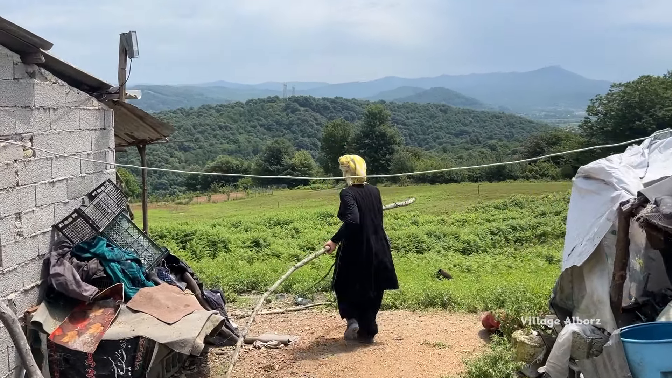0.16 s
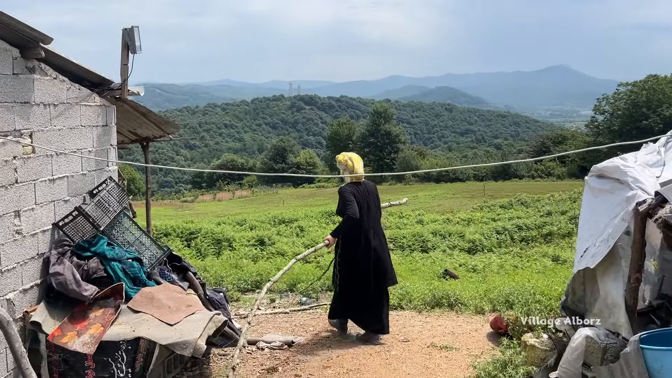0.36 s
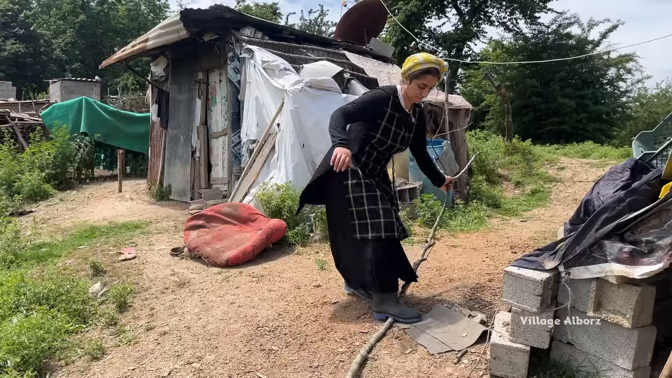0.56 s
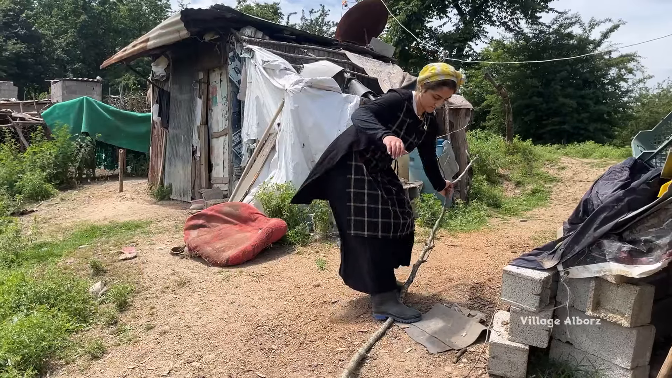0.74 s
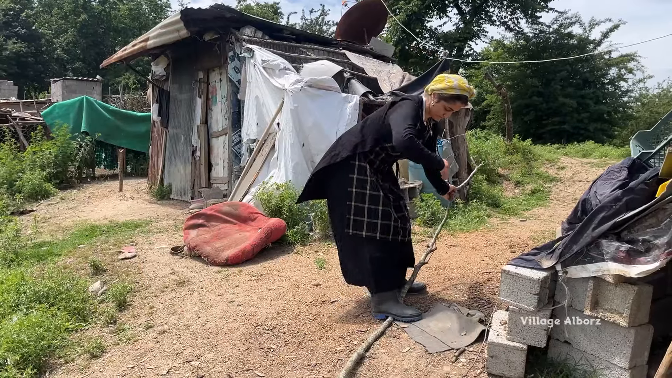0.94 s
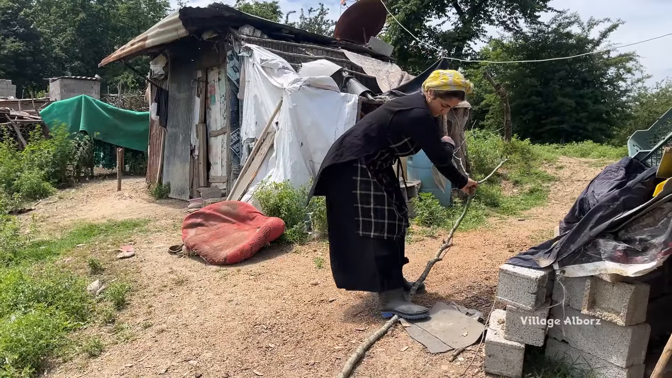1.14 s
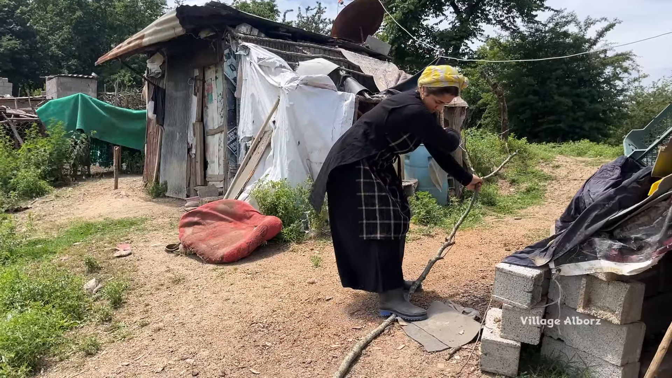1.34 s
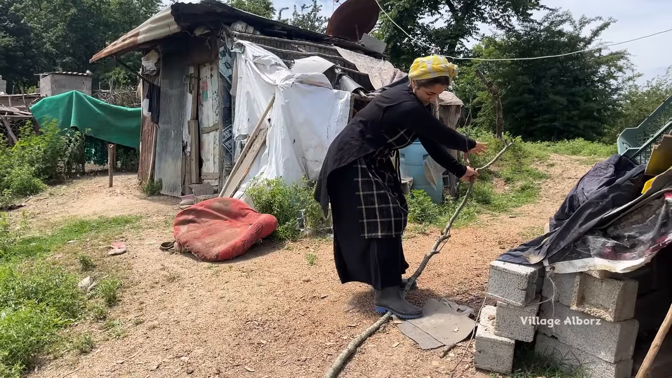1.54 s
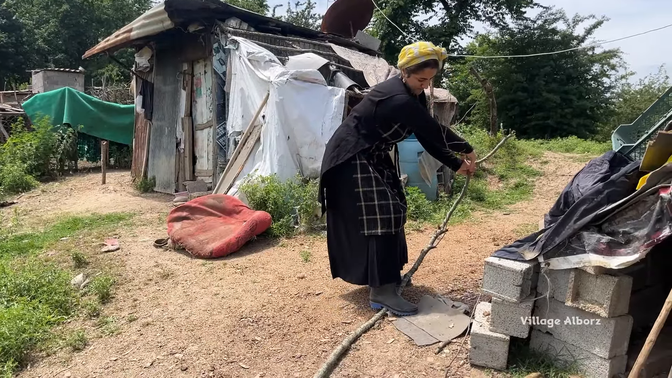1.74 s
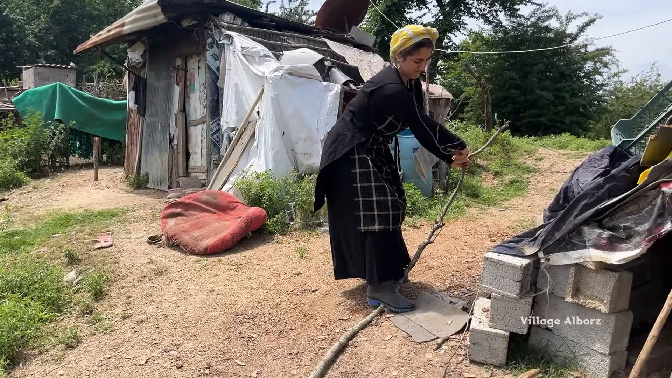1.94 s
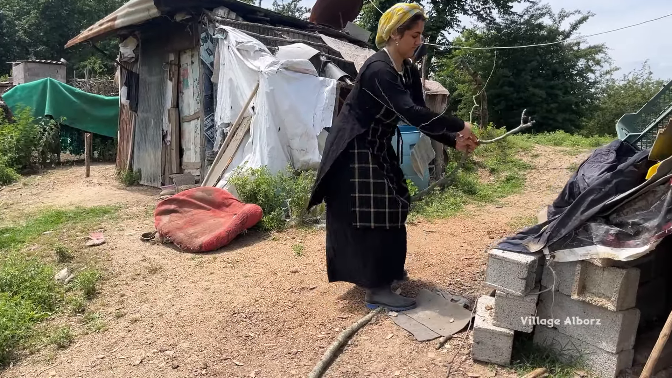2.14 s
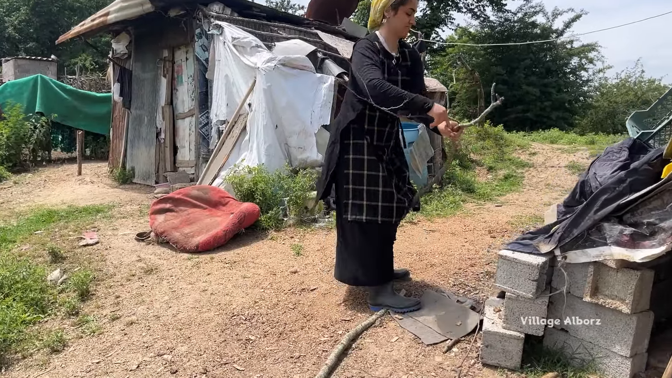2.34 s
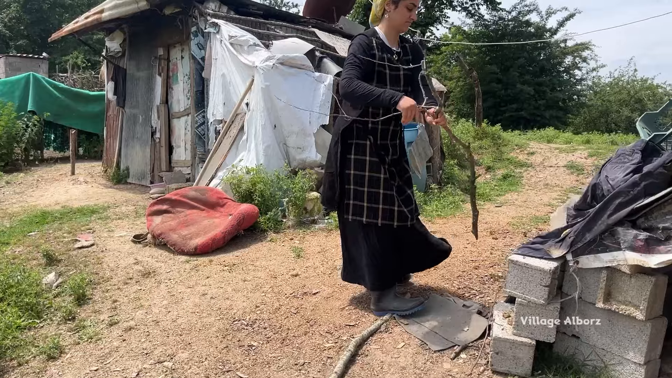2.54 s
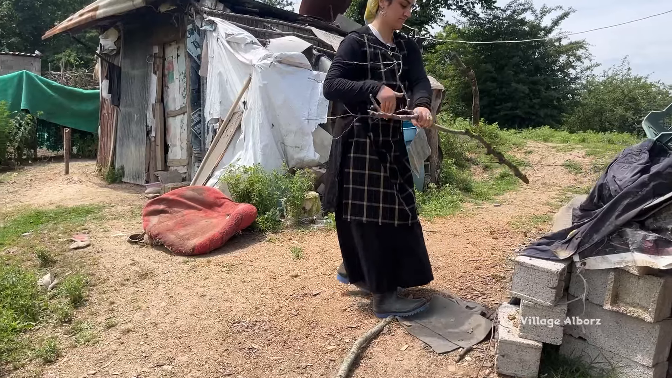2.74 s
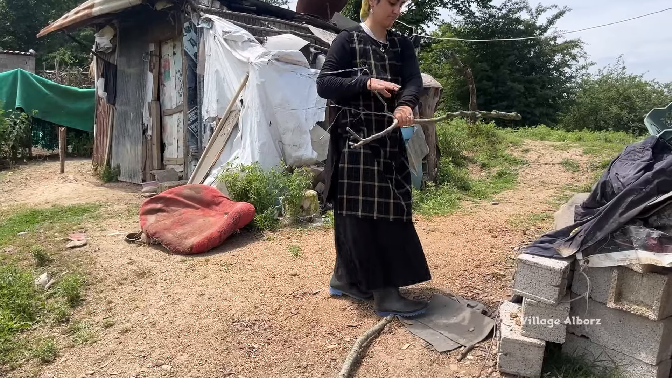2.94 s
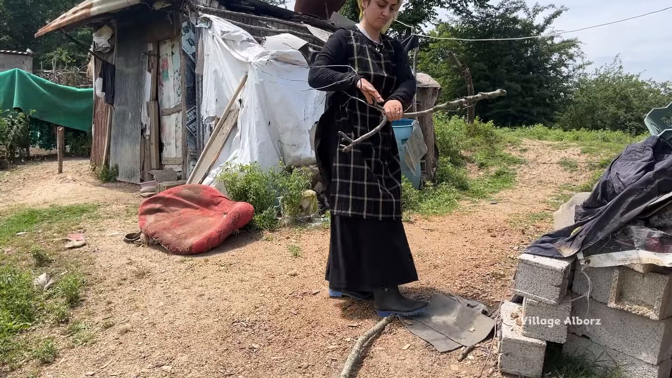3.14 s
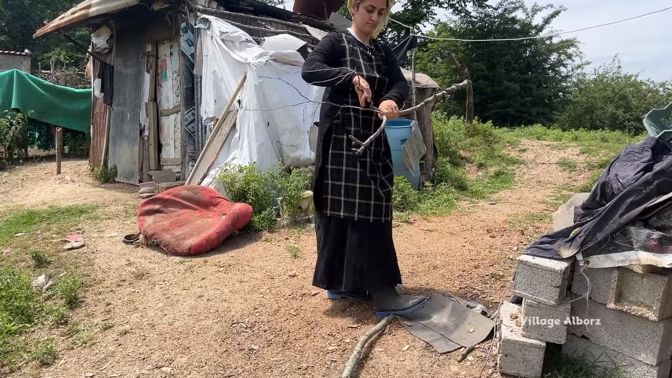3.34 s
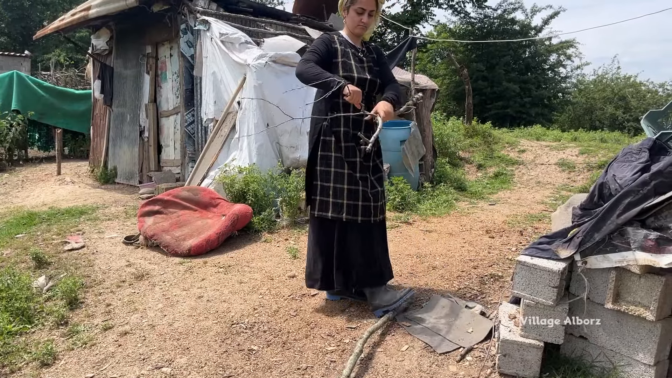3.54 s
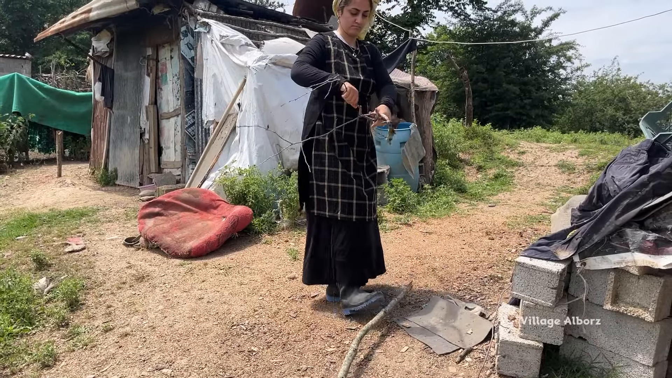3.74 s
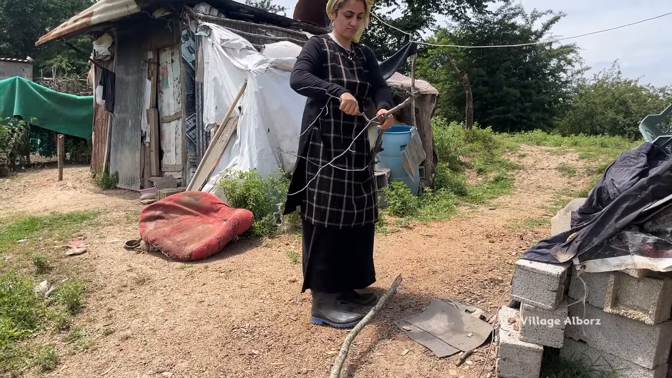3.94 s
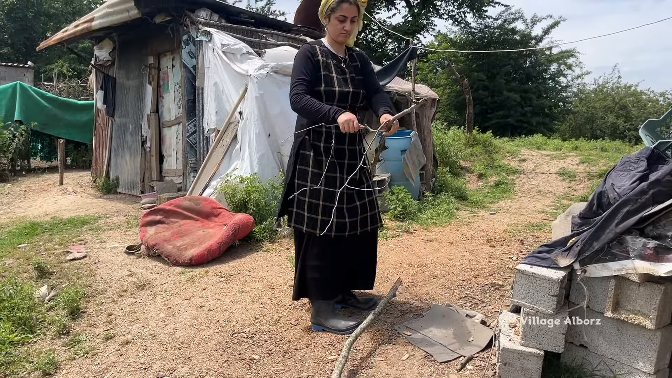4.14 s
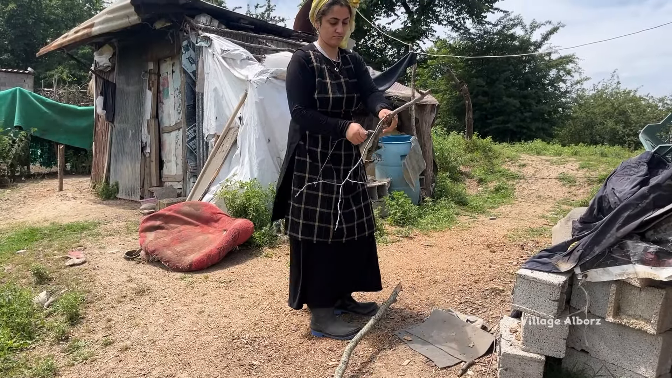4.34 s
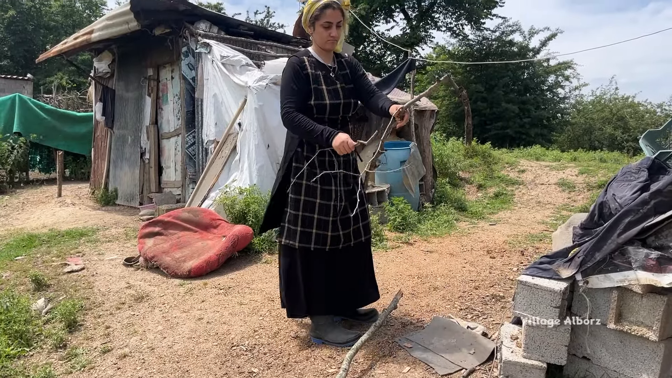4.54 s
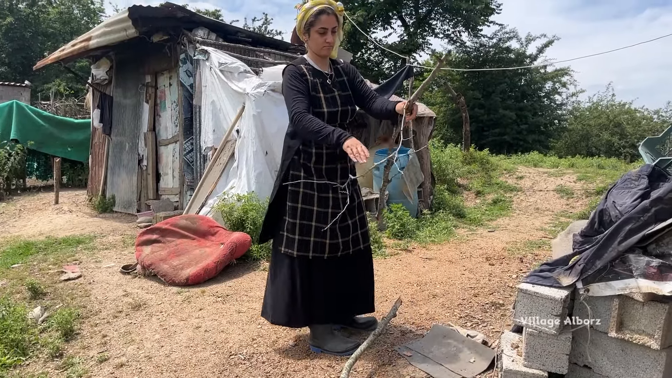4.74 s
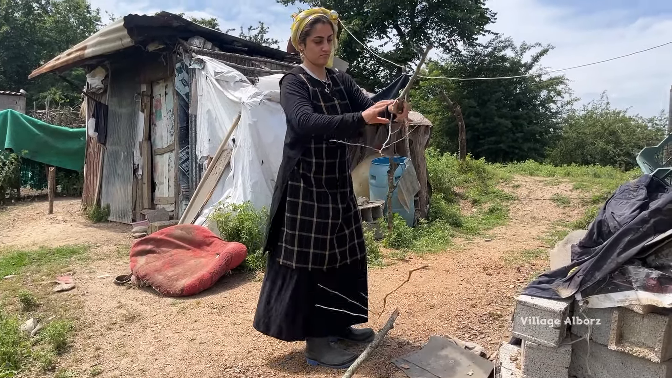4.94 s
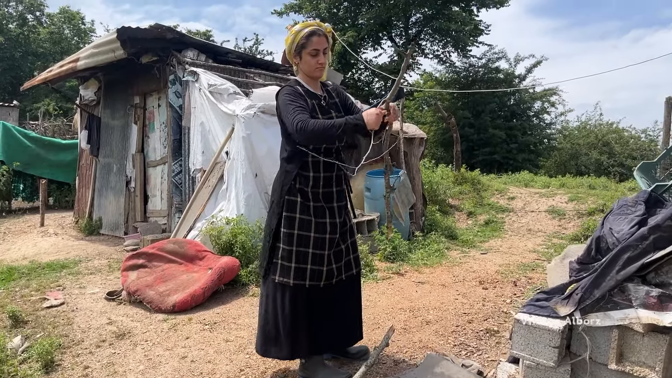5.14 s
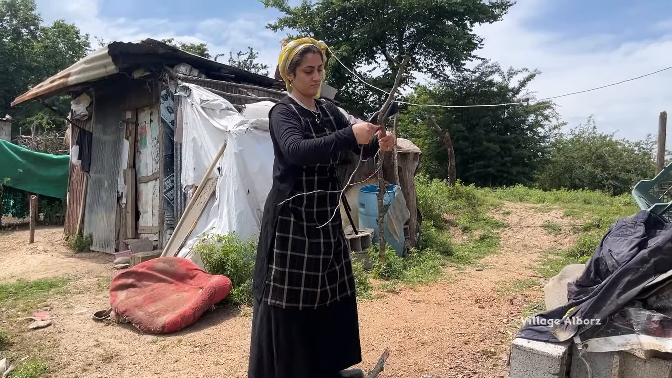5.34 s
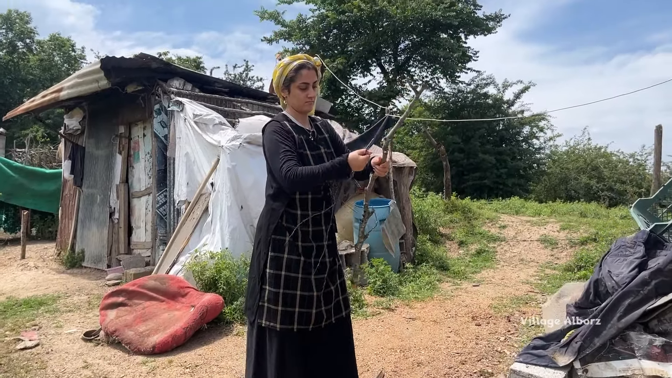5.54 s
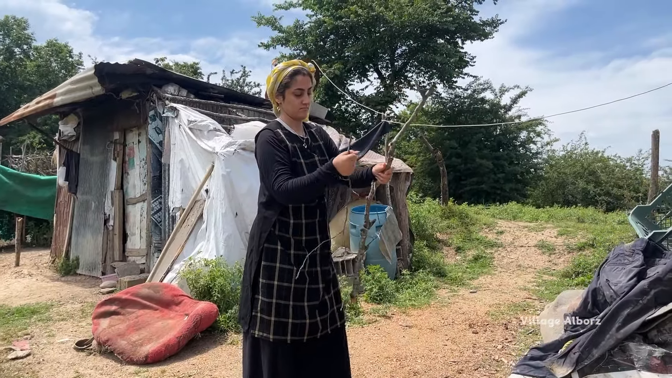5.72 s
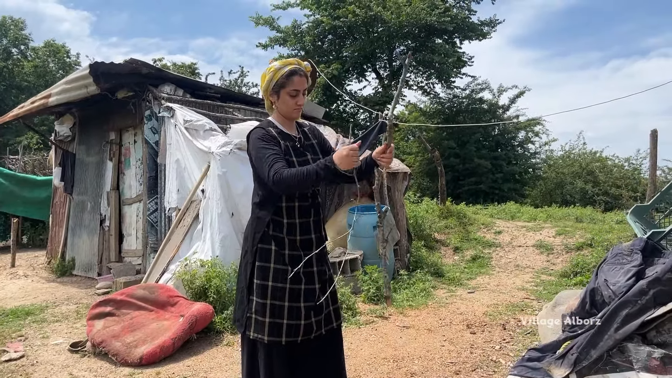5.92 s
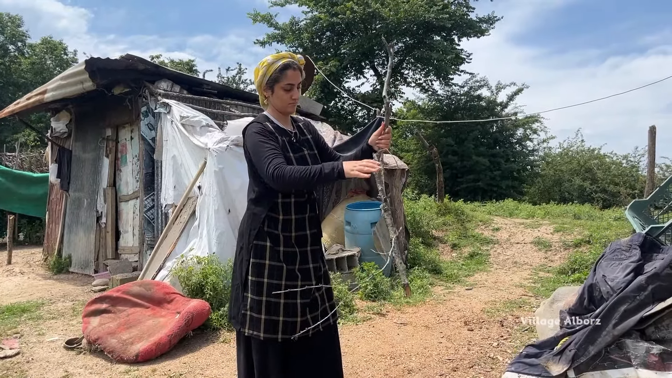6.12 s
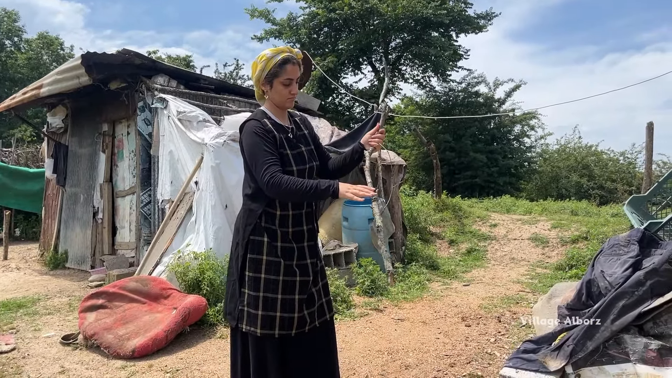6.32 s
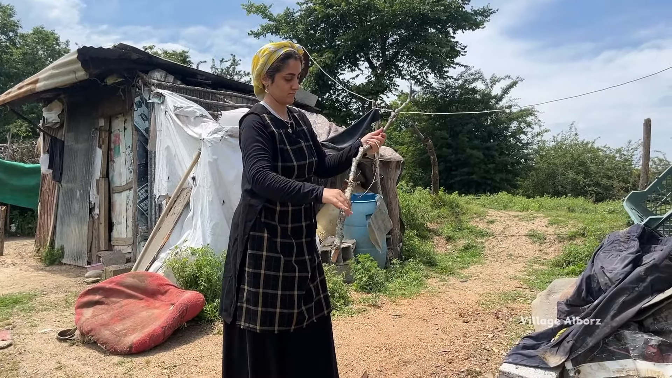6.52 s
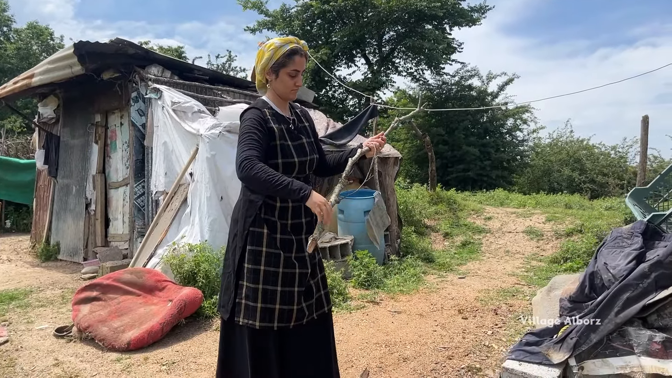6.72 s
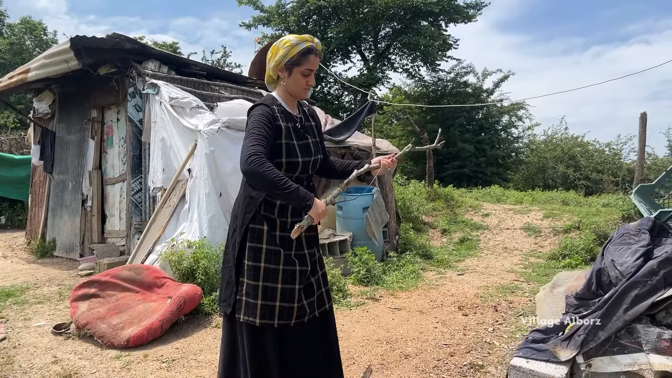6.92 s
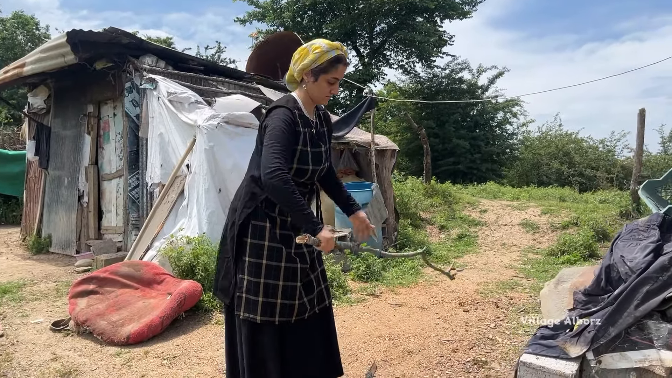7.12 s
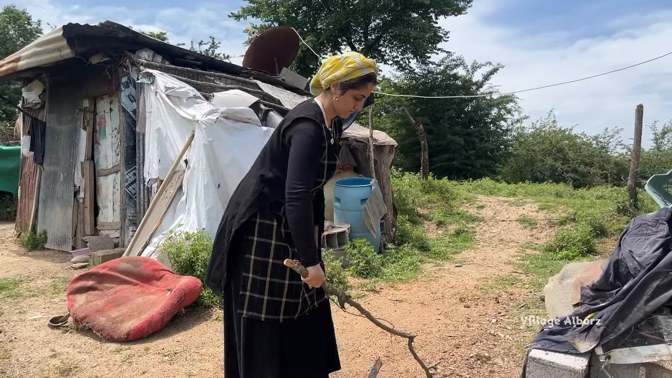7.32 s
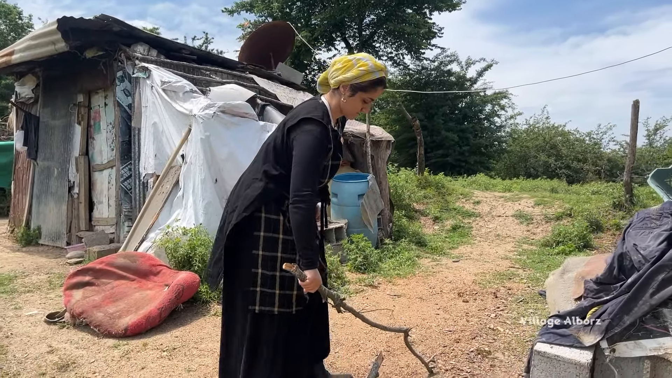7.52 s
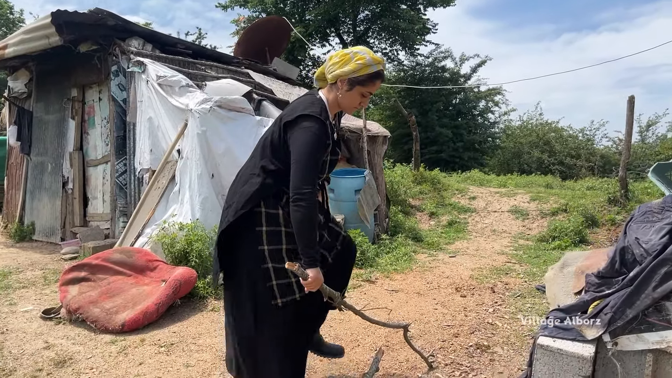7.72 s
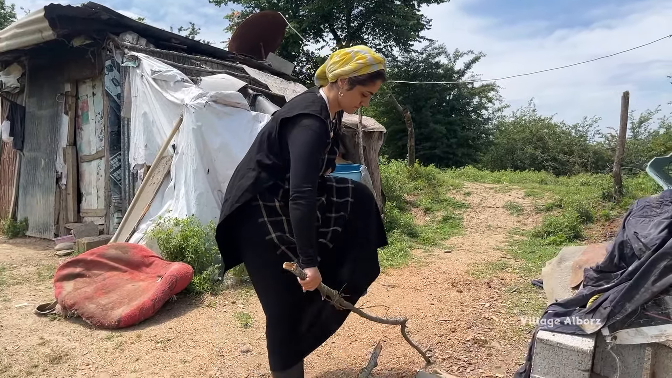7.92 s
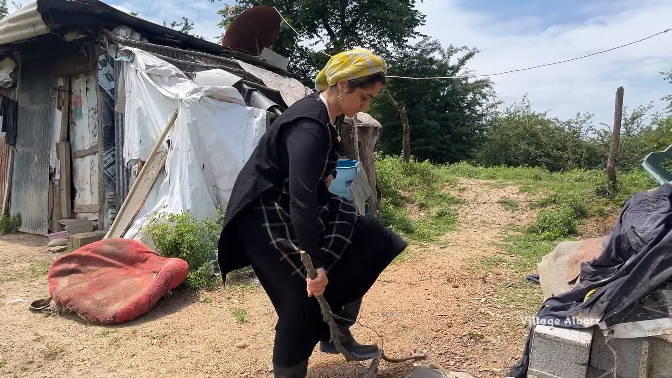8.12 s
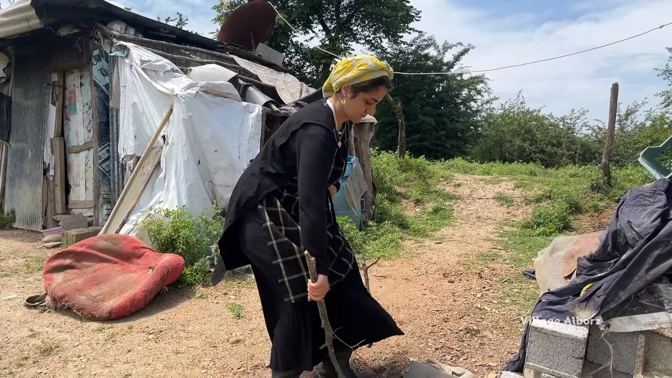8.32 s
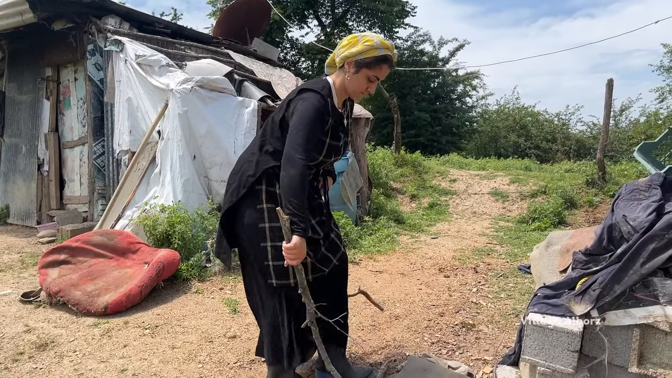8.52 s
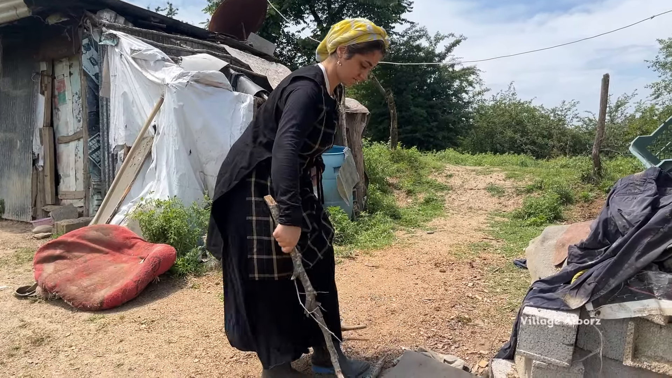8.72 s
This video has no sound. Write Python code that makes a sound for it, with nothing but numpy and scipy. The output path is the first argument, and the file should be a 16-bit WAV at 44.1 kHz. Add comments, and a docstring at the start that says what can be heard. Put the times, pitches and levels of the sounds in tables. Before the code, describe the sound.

Sharp wooden cracks, small splintery ticks and soft boot thuds over dirt; the hardest break, a double crack with a woody knock, comes near the end.

```python
"""Open farmyard: dry branches are broken by hand and under a boot.
Wood is noise bursts in half-octave bands: fibres tick under strain, snaps tear, pieces knock.
Boots thud through hollow resonances; reflections of ground, shed, trees and far walls answer.
Coloured grains make cloth, bark and grit; coloured noise makes shuffling and wind on the microphone."""
import sys
import numpy as np
from scipy import signal
from scipy.fft import rfft, irfft, next_fast_len
from scipy.io import wavfile
from scipy.ndimage import map_coordinates

SR = 44100
rng = np.random.default_rng(int(sys.argv[2]) if len(sys.argv) > 2 else 0)


def generate_wav(signal):
    """Clip the signal to [-1, 1] and save it as 16-bit WAV at the path in sys.argv[1]."""
    frames = np.transpose(np.atleast_2d(signal))
    scaled = np.clip(frames, -1, 1) * 32767
    pcm = np.round(scaled).astype(np.int16)
    wavfile.write(sys.argv[1], SR, pcm)


N = 386757
TIME_S = np.arange(N) / SR

# Event levels are taken before resonances and trims.
# branch breaks, thinner wood cracking higher: (time [s], tearing time [s], level [dB], strongest pitch [Hz],
#   fall below it [dB/octave], last fibres against the break [dB])
BRANCH_SNAPS = [(0.5249, 0.0027, -45, 1510, 7, -11), (0.5388, 0.0019, -35.5, 2840, 8, -15.5),
                (1.8217, 0.00076, -41, 2600, 11.5, -17), (2.0205, .001, -18.5, 2222, 6.5, -17),
                (3.4737, 0.00093, -49.5, 1602, 9.5, -7), (3.8315, 0.00089, -43, 7990, 6, -17),
                (4.242, 0.00122, -28, 4930, 11, -20), (5.5045, 0.00048, -26.5, 8470, 8.5, -21),
                (8.118, 0.00077, -27.5, 2820, 14.5, -6.5), (8.1904, 0.0003, -21, 3440, 11.5, -29.5)]
# single fibres giving: (time [s], level [dB], strongest pitch [Hz])
FIBRE_TICKS = [(.2902, -52, 10000), (.5755, -50.5, 7200), (1.35, -52.5, 5200), (1.4776, -58, 8000),
               (1.5737, -51.5, 9300), (1.6132, -55.5, 9000), (1.6555, -52.5, 7000), (1.6896, -57, 7000),
               (1.7246, -59, 11200), (1.7781, -42.5, 9700), (1.8323, -48.5, 11090), (3.4748, -63, 10000),
               (3.8657, -48.5, 4600), (3.974, -61.5, 3960), (4.0726, -49, 11000), (4.167, -53, 12600),
               (4.2208, -54.5, 5500), (5.0673, -60.5, 10000), (5.0986, -56, 8985), (5.108, -58.5, 4400),
               (5.141, -62, 6000), (5.1842, -65.5, 4400), (5.403, -62.5, 4400), (5.4521, -61, 4000),
               (5.477, -60.5, 3200), (6.3862, -58, 11000), (6.478, -51, 9300), (6.5187, -50.5, 4950),
               (6.7131, -51.5, 9000), (6.8432, -57.5, 4500), (6.8914, -63.5, 8900), (7.2675, -52, 5700),
               (7.3327, -47, 9000), (7.4954, -62, 4400), (8.134, -40, 4000), (8.143, -40.5, 4400),
               (8.4695, -54, 4130)]
# fibres and twigs ticking under strain: (start [s], end [s], rate [1/s], tick level [dB])
STRAIN_SPELLS = [(1.389, 1.871, 59, -65), (3.5, 3.6, 40, -70), (3.84, 3.91, 70, -63),
                 (5.162, 5.502, 40.4, -75.5), (6.404, 7.149, 45, -71.5), (7.476, 8.106, 35, -74.5),
                 (8.091, 8.121, 200, -55.5), (8.14, 8.205, 130, -48.5)]
# sticks jostling softly: (start [s], end [s], rate [1/s], tap level [dB])
JOSTLE_SPELLS = [(3.48, 3.56, 56, -61), (3.85, 3.96, 58, -62), (5.68, 6.33, 24, -73.5),
                 (6.37, 6.63, 35, -68.5), (6.74, 7.08, 43, -65.5)]
# woody knocks, and the dull woody body of some ticks and snaps: (time [s], contact time [s], level [dB],
#   strongest pitch [Hz], fall on both sides [dB/octave])
WOODY_KNOCKS = [(1.351, 0.0011, -60.5, 2030, 16), (1.5494, 0.00091, -63.5, 1860, 17),
                (1.6122, 0.0011, -61, 1770, 18), (1.7235, .001, -62, 1780, 17),
                (1.7769, 0.00086, -56, 2000, 9), (1.5737, 0.0015, -52.5, 1790, 15),
                (1.6555, 0.0011, -54.5, 1884, 10), (2.2316, 0.00087, -50, 2680, 13),
                (2.2912, 0.0016, -46, 1570, 9.5), (3.833, 0.00096, -46, 1930, 22),
                (3.833, .001, -40, 3340, 20), (3.886, .002, -59, 950, 9), (4.2939, 0.001, -55.5, 751, 6.5),
                (4.773, 0.00068, -62.5, 1190, 8), (5.1315, 0.0014, -52, 1250, 9.5),
                (5.2285, 0.0038, -52.5, 640, 6), (5.5538, 0.002, -45.5, 820, 4.5),
                (6.386, .0015, -62.5, 1400, 12.5), (6.52, 0.0015, -59.5, 2110, 11),
                (6.539, 0.0018, -61, 1413, 8), (6.731, 0.0065, -52.5, 635, 13),
                (6.9844, 0.0019, -61, 800, 4.5), (7.2668, 0.0018, -45.5, 960, 6),
                (7.9537, 0.0014, -66.5, 3390, 9), (8.1911, .0008, -28.5, 1770, 26),
                (8.2092, 0.00044, -20.5, 2680, 15), (8.2112, 0.00032, -23.5, 1950, 20),
                (8.2415, .0017, -37.5, 1980, 23), (8.288, 0.0011, -49, 2010, 22),
                (8.296, .0012, -48.5, 2600, 20), (8.3601, 0.0011, -50.5, 2250, 10.5)]
# strong bending modes of an undamped limb: (centre [Hz], width [Hz], gain [dB])
LIMB_MODES = [(878, 590, 6), (1770, 260, 9.5)]
# further peaks and dips in the wood's colour: (centre [Hz], width [Hz], gain [dB])
WOOD_COLOUR = [(2580, 300, -0.5), (3450, 250, 3.5), (4645, 250, 2), (4340, 280, -2.5), (1120, 190, -1),
               (7100, 750, 5), (10550, 990, 4), (14900, 3100, 3)]
# bark sliding through hands and over cloth: (middle [s], half length [s], level [dB], centre [Hz], width [Hz])
BARK_SLIDES = [(0.217, 0.016, -63, 1110, 1190), (0.363, 0.049, -55.5, 1200, 1420),
               (0.7, 0.012, -62.5, 700, 800), (0.835, 0.0069, -56.5, 3550, 6800),
               (2.784, 0.055, -68.5, 1480, 950), (3.064, 0.019, -63.5, 1399, 914),
               (3.9, 0.072, -67.5, 2277, 3420), (4.76, 0.026, -61, 1309, 703), (5.82, .11, -73, 1300, 900),
               (5.226, .012, -55.5, 1085, 1710), (6.405, 0.024, -64.5, 620, 298),
               (6.82, 0.054, -64, 1080, 260), (6.855, .05, -65.5, 1540, 301.6),
               (7.125, 0.014, -68.5, 4200, 3000), (7.604, 0.02, -68.5, 3200, 3480),
               (7.002, 0.038, -70, 990, 890), (7.269, 0.011, -46.5, 1000, 1070)]
# dull blows of boots and wood: (time [s], contact time [s], level [dB], strongest pitch [Hz])
DULL_BLOWS = [(0.689, 0.01, -50.5, 408), (0.824, 0.004, -43.5, 265), (2.03, 0.008, -32.5, 178),
              (2.1, 0.0035, -46.5, 487), (2.7914, 0.0016, -48.5, 152.8), (2.825, 0.0029, -48.5, 178),
              (3.474, 0.0076, -44.5, 138), (3.8545, 0.016, -49, 300), (5.225, 0.007, -45.5, 140),
              (5.553, 0.0015, -40.5, 455), (5.994, .002, -61, 398), (7.264, 0.0081, -43.5, 218),
              (7.4683, 0.0018, -48, 131), (8.069, 0.0018, -40.5, 141), (8.1154, 0.01, -40, 266),
              (8.1881, 0.017, -29, 141), (8.2148, .007, -29, 223), (8.243, 0.0018, -32, 220)]
# hollow colour of a blow: (centre [Hz], width [Hz], gain [dB])
HOLLOW_MODES = [(131, 8.8, 4.5), (163, 25, -6.5), (196, 17, 3), (257, 10, 4.5)]
# steps and changes of grip: (start [s], end [s], rubbing level [dB], grit level [dB])
MOVEMENT_SPELLS = [(0, 0.543, -64, -63.5), (.56, 1.185, -68.5, -75), (1.385, 1.82, -71, -73.5),
                   (2.049, 2.382, -76, -76), (2.744, 3.076, -76, -83.5), (3.474, 3.625, -69, -71.5),
                   (3.83, 3.953, -66, -71.5), (4.246, 4.356, -78, -77.5), (5.069, 5.656, -76, -75.5),
                   (5.7, 6.296, -80.5, -94.5), (6.402, 7.343, -73.5, -77), (7.478, 8.088, -74.5, -76.5),
                   (8.11, 8.22, -52.5, -59), (8.283, 8.569, -87, -74)]
# slow background levels before trims: (time [s], wind level [dB], shuffling level [dB])
BACKGROUND_LEVELS = [(0, -54.5, -60), (.35, -60.5, -67), (.85, -54.5, -61.5), (1.25, -59, -65.5),
                     (2.05, -58, -63), (2.4, -68, -72.5), (3.8, -63, -75.5), (4.6, -65, -76.5),
                     (5.4, -64.5, -70.5), (6.25, -64, -72.5), (7.0, -59, -66.5), (7.7, -59, -71),
                     (8.05, -57, -63.5), (8.22, -49.5, -47.5), (8.34, -52.5, -56.5), (8.55, -63, -75),
                     (8.77, -60.5, -66.5)]
# relative spectra, scaled to rms 1 in use: (frequency [Hz], density [dB per Hz])
SHUFFLE_SPECTRUM = [(90, -16.5), (170, 0.5), (350, -1), (550, -7), (900, -21.5), (2000, -41.5)]
RUB_SPECTRUM = [(350, -20), (750, 1.5), (1400, 0.5), (2000, -5), (2800, -12), (5000, -16.5), (12000, -46.5)]
GRIT_SPECTRUM = [(1200, -17), (2500, -1), (3600, -0.5), (6500, -3), (8500, -13.5), (10500, 0.5),
                 (14000, -7), (16000, -16.5)]
WIND_SPECTRUM = [(15, -31), (25, -12), (40, -7), (65, 4), (95, -0.5), (140, -6), (220, -16), (400, -51)]
# left-right likeness of movement and wind: (frequency [Hz], correlation [0 to 1])
STEREO_LIKENESS = [(60, 1), (200, 0.96), (640, 0.25), (1400, 0.16), (4000, 0.14), (8000, 0.78), (15000, 1)]
# colour of wood, blows and echoes at each microphone port: (centre [Hz], width [Hz], gain [dB])
LEFT_PORT_MODES = [(746, 250, 3.5), (1040, 530, -5.5), (3650, 2200, 3)]
RIGHT_PORT_MODES = [(740, 440, -8.5), (1610, 600, -3), (3382, 5800, -5.5)]
# all-pass turns of the left port: (centre [Hz], width [Hz])
LEFT_PORT_TURNS = [(660, 28), (1400, 100), (7200, 2700), (12500, 2400)]

# slopes: fall (below, above) the strongest pitch
SECOND_BREAK_S, SECOND_BREAK_DB = 0.0024, -8
LAST_FIBRES_S, LAST_FIBRES_TEAR_S = 0.0091, 0.0051
SNAP_TREBLE_FALL_DB_PER_OCTAVE = 5.5
TICK_S, TICK_SLOPES_DB_PER_OCTAVE = 0.0005, (7.3, 6.5)
STRAIN_HZ, SPELL_SPREAD_DB = 5540, 0.5
TAP_HZ, TAP_S, TAP_SLOPES_DB_PER_OCTAVE = 1250, 0.0012, (13, 41)
THUD_SLOPES_DB_PER_OCTAVE = (12, 11)
MOVE_ATTACK_S, MOVE_RELEASE_DB_PER_S = 0.03, 124
RUB_REST_DB, GRIT_REST_DB = -8, -20.5   # between movements, against the shuffling column
RIGHT_LATER_S, CUTOFF_HZ = 0.000034, 16100


def branches():
    """Tearing and knocking excite the wood; loud low cracks ring a limb, the rest is damped by the hand."""
    edges_hz = 340 * 2 ** (np.arange(12) / 2)
    ticks = list(FIBRE_TICKS) + scattered(STRAIN_SPELLS, STRAIN_HZ, spread_octaves=0.83)
    taps = scattered(JOSTLE_SPELLS, TAP_HZ, spread_octaves=0.35)
    events = snaps()
    events += [(s, contact_s, db, hz, (fall, fall)) for s, contact_s, db, hz, fall in WOODY_KNOCKS]
    events += [(s, TICK_S, db, hz, TICK_SLOPES_DB_PER_OCTAVE) for s, db, hz in ticks]
    events += [(s, TAP_S, db, hz, TAP_SLOPES_DB_PER_OCTAVE) for s, db, hz in taps]
    ringing, held = [], []
    for event in events:
        _, _, db, hz, _ = event
        (ringing if db > -33 and hz < 4000 else held).append(event)
    damped_modes = [(hz, 2.5 * width_hz, 0.45 * db) for hz, width_hz, db in LIMB_MODES]
    limbs = resonate(bursts(ringing, edges_hz, spread_db=3.5, size=3000), LIMB_MODES)
    twigs = resonate(bursts(held, edges_hz, spread_db=6.5, size=3000), damped_modes)
    return resonate(from_db(-5.0) * (limbs + twigs), WOOD_COLOUR)


def snaps():
    """A branch breaks in three stages: near side, far side, last fibres."""
    stages = []
    for s, tear_s, db, hz, bass_fall, fibres_db in BRANCH_SNAPS:
        slopes = (bass_fall, SNAP_TREBLE_FALL_DB_PER_OCTAVE)
        stages.append((s, tear_s, db, hz, slopes))
        stages.append((s + SECOND_BREAK_S, tear_s, db + SECOND_BREAK_DB, hz, slopes))
        stages.append((s + LAST_FIBRES_S, LAST_FIBRES_TEAR_S, db + fibres_db, hz, slopes))
    return stages


def scattered(spells, hz, spread_octaves):
    """Small ticks or taps of slightly uneven size and varied pitch, at random within each spell."""
    events = []
    for start_s, end_s, per_s, db in spells:
        place = rng.random(40)
        size, pitch = rng.standard_normal((2, 40))
        count = int(np.clip((end_s - start_s) * per_s, 1, len(place)))
        times_s = start_s + (end_s - start_s) * place[:count]
        events += zip(times_s, db + SPELL_SPREAD_DB * size, hz * 2 ** (spread_octaves * pitch))
    return events


def bursts(events, edges_hz, spread_db, size):
    """Each event (time, rise, level, pitch, slopes) is a swell and decay of tiny slips in half-octave bands."""
    starts_s, rises_s = np.transpose([event[:2] for event in events])
    out = np.zeros(N + size)
    age = np.arange(size) / SR / np.maximum(rises_s[:, None], 1e-4)
    chance = rng.standard_normal((len(events), 2, size))
    slips = chance[:, 0] * from_db(spread_db * chance[:, 1]) * age * np.exp(-age)
    sounds = 0
    for k, (low_hz, high_hz) in enumerate(zip(edges_hz, edges_hz[1:])):
        part = band(slips + 1e-18, low_hz, high_hz)
        level_db = [hump(np.sqrt(low_hz * high_hz), *event[2:]) for event in events]
        # level: band energy spread over 10 ms
        gain = from_db(level_db) / np.sqrt(np.sum(part ** 2, axis=1) / (SR / 100))
        sounds = sounds + (-1) ** k * gain[:, None] * part
    for start, sound in zip((starts_s * SR).astype(int), sounds):
        out[start:start + size] += sound
    return out[:N]


def hump(hz, db, top_hz, slopes):
    """Level at hz of a spectrum that falls away on both sides of its top."""
    octaves = np.log2(hz / top_hz)
    return db + slopes[0] * np.minimum(octaves, 0) - slopes[1] * np.maximum(octaves, 0)


def splinters(wood):
    """Cracking wood sheds a dying spray of tiny splinters: clicks under its smoothed envelope."""
    keep = np.exp(-1 / (0.009 * SR))   # 9 ms smoothing
    spray = np.sqrt(signal.lfilter([1 - keep], [1, -keep], wood ** 2 + 1e-18))
    clicks = band(grains(per_s=3000, spread_db=3.0)[0], 1500, 7000)
    return from_db(-18.5) * spray * rms_one(clicks)


def slides():
    """Bark rubs in short swells of uneven friction noise, each in one broad band."""
    out = np.zeros(N)
    friction = rng.standard_normal(N) * from_db(4.5 * drift(190))
    for s, half_length_s, db, hz, width_hz in BARK_SLIDES:
        swell = np.exp(-((TIME_S - s) / half_length_s) ** 2 / 2)
        rub = band(friction, max(hz - width_hz / 2, 100), hz + width_hz / 2)
        out += from_db(db) * swell * rms_one(rub)
    return out


def thuds():
    """Soft, heavy contacts with earth and body excite hollow low resonances."""
    edges_hz = 85 * 2 ** (np.arange(7) / 2)
    events = [(*blow, THUD_SLOPES_DB_PER_OCTAVE) for blow in DULL_BLOWS]
    return from_db(-2.5) * resonate(bursts(events, edges_hz, spread_db=1.0, size=8192), HOLLOW_MODES)


def movement():
    """Boots shuffle as noise; cloth and bark rub and grit crunches in clumps, as random grains."""
    _, shuffle_db = in_time(BACKGROUND_LEVELS)
    rubbing, crunching = from_db(shuffle_db + RUB_REST_DB), from_db(shuffle_db + GRIT_REST_DB)
    for start_s, end_s, rub_db, grit_db in MOVEMENT_SPELLS:
        shape = gesture(start_s, end_s)
        rubbing = np.maximum(rubbing, from_db(rub_db) * shape)
        crunching = np.maximum(crunching, from_db(grit_db) * shape)
    clumps_db = 6.2 * drift(110) + 2.0 * drift(22)
    strokes_db = 1.5 * drift(60) + 2.0 * drift(29)
    scuffing_db = 1.2 * drift(25)
    shuffle_noise = colour(rng.standard_normal((2, N)), SHUFFLE_SPECTRUM)
    shuffle = from_db(shuffle_db + 3.0 + scuffing_db) * shuffle_noise
    rub = rubbing * from_db(strokes_db) * colour(grains(per_s=4200, spread_db=3.0), RUB_SPECTRUM)
    grit = crunching * from_db(clumps_db) * colour(grains(per_s=12000, spread_db=4.0), GRIT_SPECTRUM)
    return shuffle + rub + grit


def gesture(start_s, end_s):
    """A movement rises just ahead of its start, holds and dies away after its end."""
    attack = np.clip(1 + (TIME_S - start_s) / MOVE_ATTACK_S, 0, 1)
    return attack * from_db(-MOVE_RELEASE_DB_PER_S * np.maximum(TIME_S - end_s, 0))


def yard(x):
    """Diffuse reflections: ground first, then shed, then trees and far walls."""
    ground = scatter(delay_s=0.002, t60_s=0.054, low_hz=495, high_hz=13800, level_db=-10.5)
    shed = scatter(delay_s=0.013, t60_s=0.16, low_hz=300, high_hz=11100, level_db=-16.5)
    trees = scatter(delay_s=0.03, t60_s=0.42, low_hz=200, high_hz=3000, level_db=-32)
    far_wall = scatter(delay_s=0.08, t60_s=0.28, low_hz=2000, high_hz=11600, level_db=-40)
    return signal.fftconvolve(x[None], ground + shed + trees + far_wall, axes=1)[:, :N]


def scatter(delay_s, t60_s, low_hz, high_hz, level_db):
    """Decaying noise, different at each ear, as an impulse response; level set before the band-pass."""
    age_s = np.arange(SR // 2) / SR - delay_s
    decay = from_db(-60 * np.maximum(age_s, 0) / t60_s)
    cloud = rng.standard_normal((2, len(age_s))) * (age_s > 0) * decay
    return from_db(level_db) * band(cloud / np.sqrt(np.sum(cloud ** 2) / 2), low_hz, high_hz)


def wind():
    """Light wind on the microphone: low noise with a lumpy level."""
    wind_db, _ = in_time(BACKGROUND_LEVELS)
    gusts_db = 1.2 * drift(18)
    return from_db(wind_db + 3.5 + gusts_db) * colour(rng.standard_normal((2, N)), WIND_SPECTRUM)


def from_db(db):
    """Decibels to gain."""
    return 10 ** (np.asarray(db) / 20)


def rms_one(x):
    """Scale to unit rms."""
    return x / np.sqrt(np.mean(x ** 2) + 1e-20)


def in_time(rows):
    """Each column of a curve at every sample."""
    s, *columns = np.transpose(rows)
    return [np.interp(TIME_S, s, column) for column in columns]


def at_hz(points, hz):
    """Read a spectrum on a log-frequency axis."""
    points_hz, values = np.transpose(points)
    return np.interp(np.log(hz), np.log(points_hz), values)


def band(x, low_hz, high_hz):
    """Gentle causal band-pass."""
    edges_hz = [low_hz, min(high_hz, SR / 2 - 500)]
    return signal.sosfilt(signal.butter(2, edges_hz, "band", fs=SR, output="sos"), x)


def resonate(x, modes):
    """Raise or lower each resonance in turn."""
    for hz, width_hz, db in modes:
        b, a = signal.iirpeak(hz, hz / width_hz, fs=SR)
        x = x + (from_db(db) - 1) * signal.lfilter(b, a, x + 1e-18)
    return x


def drift(steps_per_s):
    """Random level joined by straight lines, rms 1."""
    steps = rng.standard_normal(4096)
    return rms_one(np.interp(TIME_S * steps_per_s, np.arange(len(steps)), steps))


def grains(per_s, spread_db):
    """Random clicks of very uneven size, on two channels."""
    sizes = from_db(spread_db * np.minimum(rng.exponential(1, (2, N)), 4))
    return sizes * rng.standard_normal((2, N)) * (rng.random((2, N)) < per_s / SR)


def colour(pair, spectrum):
    """Two unrelated signals become coloured stereo, most alike in bass and top treble; rms 1."""
    length = next_fast_len(N)
    hz = np.maximum(np.fft.rfftfreq(length, 1 / SR), 1)
    mid, side = rfft(pair, length) * from_db(at_hz(spectrum, hz))
    alike = np.clip(at_hz(STEREO_LIKENESS, hz), 0, 1)
    stereo = np.sqrt(1 + alike) * mid + np.sqrt(1 - alike) * side * [[1], [-1]]
    return rms_one(irfft(stereo, length)[:, :N])


def scene():
    """Wood and boots close by, the yard around them."""
    breaks, blows = branches(), thuds()
    wood = breaks + splinters(breaks) + slides()
    direct = wood + blows * from_db([[-0.9], [0.9]])   # blows lean right
    left, right = direct + yard(wood + blows)
    near = np.array([resonate(left, LEFT_PORT_MODES), resonate(right, RIGHT_PORT_MODES)])
    return near + movement() + wind()


def record(dry):
    """Left port turns the phase, right hears a little later; peaks are rounded and the top is cut."""
    left = dry[0]
    right = map_coordinates(dry[1], [(TIME_S - RIGHT_LATER_S) * SR], order=5)
    for hz, width_hz in LEFT_PORT_TURNS:
        b, a = signal.iirpeak(hz, hz / width_hz, fs=SR)
        left = left - 2 * signal.lfilter(b, a, left)   # all-pass
    rounded = 1.5 * np.tanh(np.array([left, right]) / 1.5)
    return signal.sosfilt(signal.ellip(10, 0.2, 80, CUTOFF_HZ, fs=SR, output="sos"), rounded)


dry = scene()
out = record(dry)
generate_wav(out)
```